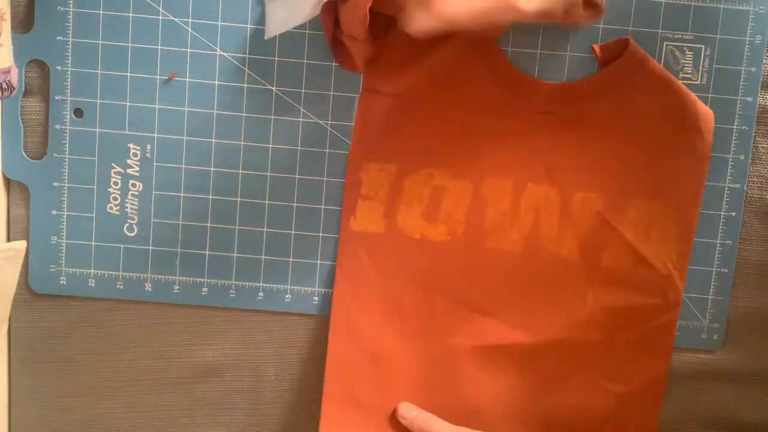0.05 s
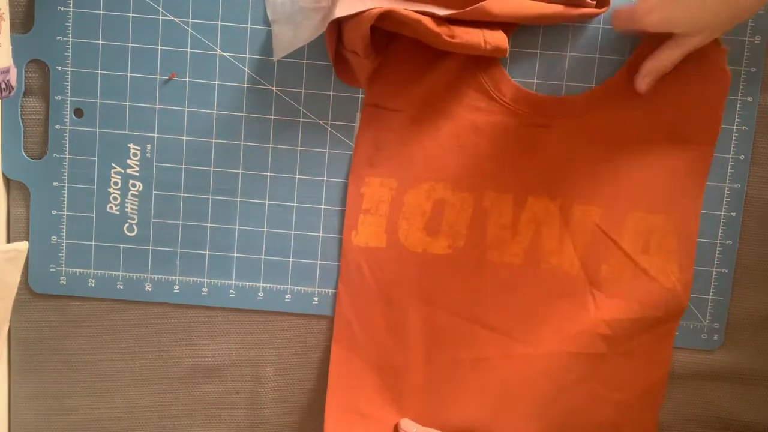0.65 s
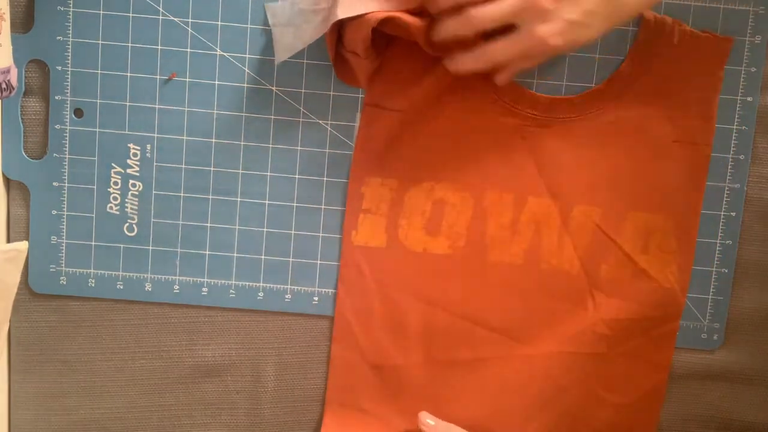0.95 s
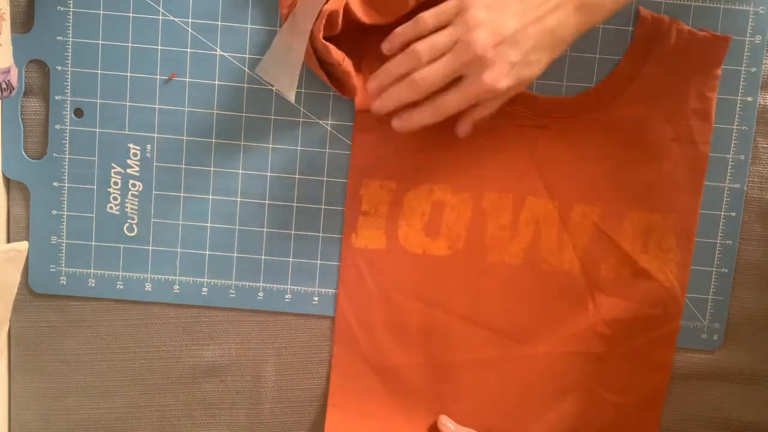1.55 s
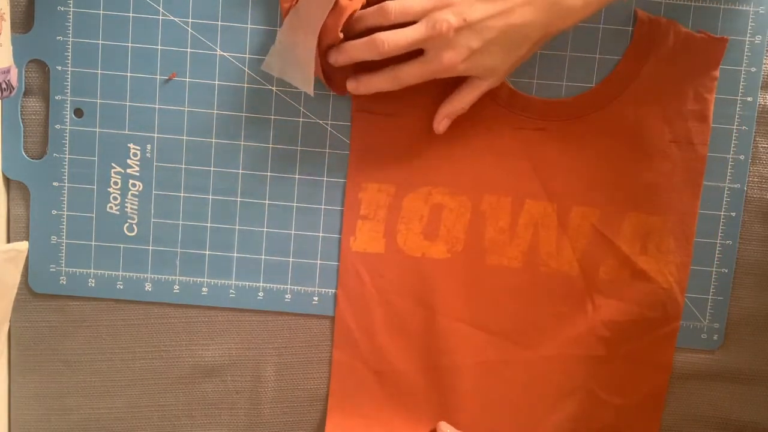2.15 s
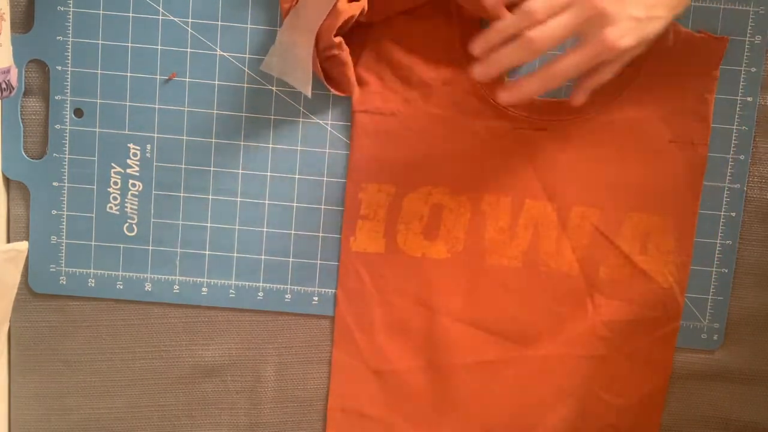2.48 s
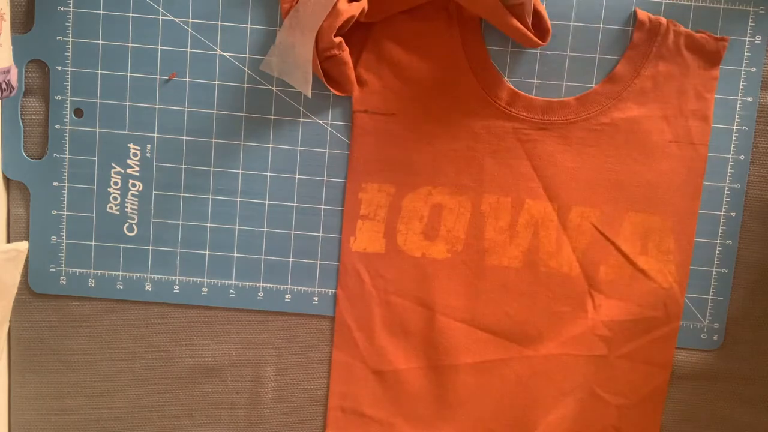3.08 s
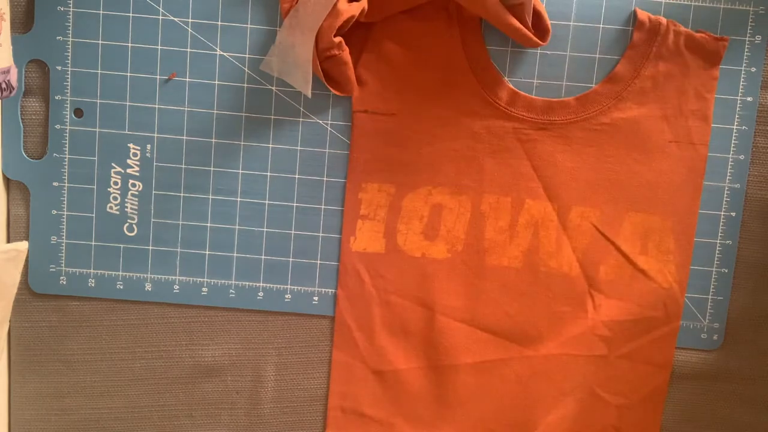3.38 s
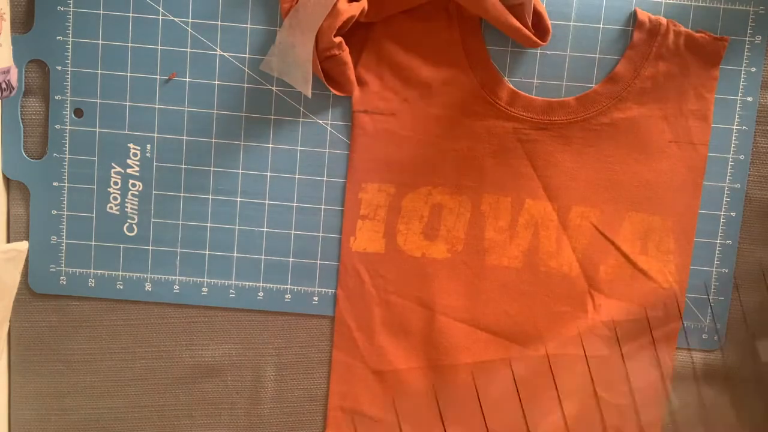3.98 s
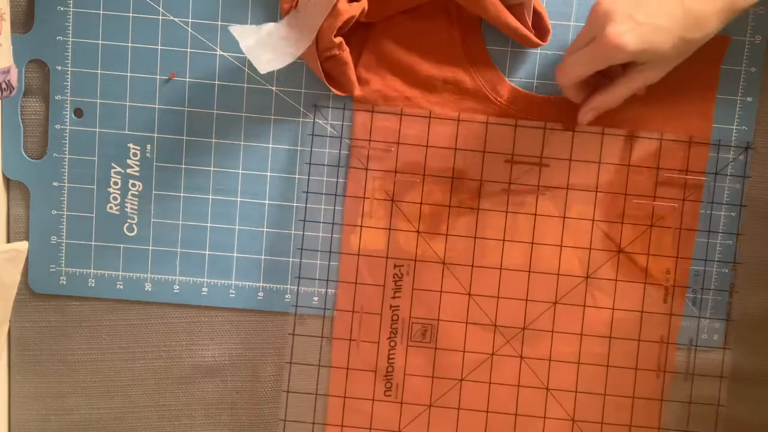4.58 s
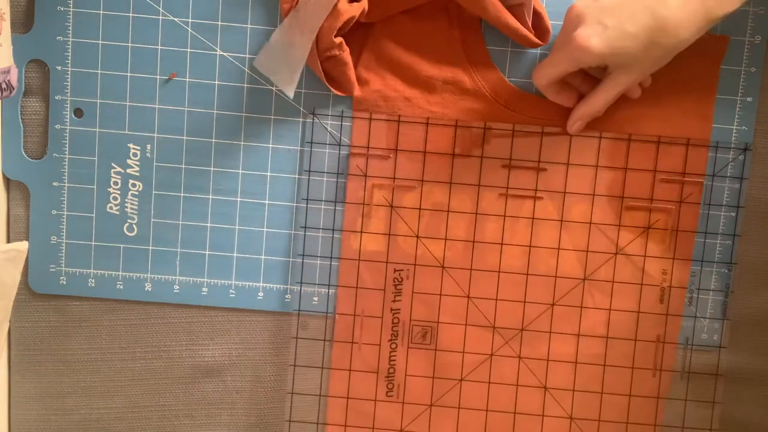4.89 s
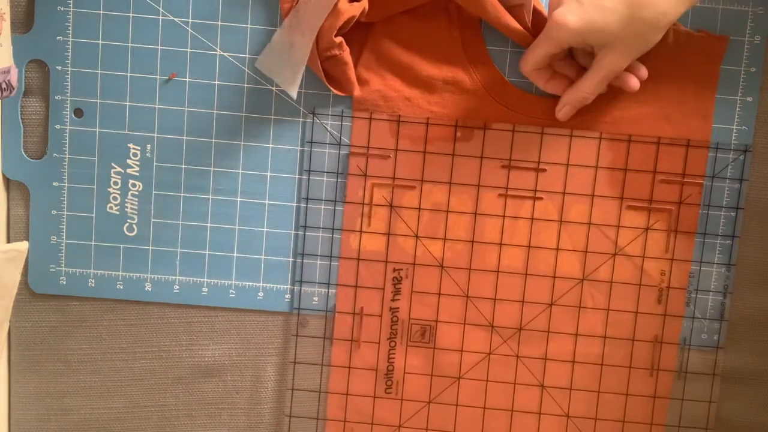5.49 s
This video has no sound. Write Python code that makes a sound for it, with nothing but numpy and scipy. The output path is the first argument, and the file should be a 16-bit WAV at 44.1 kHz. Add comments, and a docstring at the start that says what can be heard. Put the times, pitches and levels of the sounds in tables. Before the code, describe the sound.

Right at the start, a plastic tool clacks down on a table with a cutting mat, rattling and skidding briefly, then knocks again at about 0.5 seconds. Until roughly 2.5 seconds, hands smooth a cotton shirt in soft, hissing strokes, with muffled bumps and low palm pats near 1 second and from 1.5 to 1.8 seconds. Around 2.8 to 3.1 seconds comes another cluster of hard knocks, followed by small dry ticks. Meanwhile an acrylic ruler is dragged across the table and cloth, a quiet, grainy rub lasting until about 4.5 seconds. It lands on the shirt with several light clacks between 4.2 and 4.5 seconds, and is nudged near 4.9 and 5.1 seconds amid brief cloth swishes. The knocks shake the table slightly. Everything is close, in a small room with a faint low rumble and electrical hum.

```python
"""Smoothing a shirt on a cutting mat

Close up, hands turn and smooth a cotton shirt on a plastic mat, its fibres catching in a soft hiss.
A tool clacks down and skids, palms pat the cloth, then an acrylic ruler is dragged over, laid on
the shirt and nudged. Every knock shakes the table; a small room and a faint mains hum lie behind."""
import sys
import numpy as np
from scipy import signal
from scipy.fft import rfft, irfft
from scipy.io import wavfile
from scipy.ndimage import uniform_filter1d

SR = 44100
rng = np.random.default_rng(int(sys.argv[2]) if len(sys.argv) > 2 else 0)


def put_to_file(sound):
    """Save the sound as 16-bit audio at rate SR, in the file named by the first command-line argument."""
    columns = np.atleast_2d(sound).T  # one column per channel
    safe = np.clip(columns, -1, 1)
    whole_steps = np.round(safe * 32767)
    wavfile.write(sys.argv[1], SR, whole_steps.astype(np.int16))


N = 244314
T = np.arange(N) / SR
AGE = T[:SR // 2]  # seconds since a hit

# room tone, mostly deep rumble: freq_hz, gain_db
AIR_EQ = [(12, 13.5), (25, -1), (45, -14), (80, -12.5), (180, -28.5), (300, -25), (600, -36.5), (1000, -36),
          (1700, -41.5), (2500, -47.5), (4000, -50.5), (7500, -52.5), (10000, -57.5), (15000, -63)]
# mains hum partials: pitch_hz, level_db
HUM_PARTIALS = [(59.8, -51), (119.6, -60.5)]
# strokes over the cloth: fastest_s, hiss_db, dull_vs_hiss_db, rise_s, fall_s, rasp_hz
CLOTH_STROKES = [(0.07, -68.5, -0.5, 0.16, 0.48, 1440), (0.39, -61.5, -4, 0.048, 0.083, 8000),
                 (0.535, -59, -0.5, 0.063, 0.027, 3000), (0.915, -56.5, -2, 0.059, 0.13, 2600),
                 (1.14, -66, 2.5, 0.4, .14, 5100), (1.51, -60, 0.5, 0.037, 0.045, 7040),
                 (1.62, -68, -3.5, 0.14, 0.091, 6900), (1.78, -62.5, -0.5, 0.069, 0.14, 7300),
                 (2.13, -69.5, -2.5, 0.29, 0.15, 1860), (3.7, -76.5, 10, 0.2, 0.23, 1760),
                 (4.378, -63.5, 1.5, 0.029, 0.075, 1870), (4.525, -65.5, -1.5, 0.019, 0.54, 1580),
                 (4.72, -63.5, -3, 0.067, 0.085, 2150), (4.865, -61, -0.5, 0.095, 0.16, 4880),
                 (5.13, -63, 0, 0.016, 0.039, 2760), (5.245, -58, -12, 0.052, 0.027, 2960)]
# tone of rubbed cotton: freq_hz, gain_db
COTTON_EQ = [(400, 0.5), (700, -3), (1000, -7.5), (1750, 1), (2400, -1), (3300, -4), (4400, -9.5),
             (5200, -11.5), (6300, -12), (7600, -13), (8700, -17), (12000, -24.5), (15500, -33)]
# the tool hitting mat and table: start_s, tick_db, clack_db, thud_db, shake_db, clack_hz
TOOL_HITS = [(0.0962, -37, -21.5, -18.5, -30.5, 1540), (0.1008, -35.5, -33.5, -72, -26.5, 1530),
             (0.1142, -69, -34, -43, -37, 2000), (0.1402, -51, -31, -52, -47, 1680),
             (0.17, -48, -29.5, -42, -52, 1470), (0.2236, -54, -39, -41, -45, 1440),
             (0.5085, -66, -39, -23.5, -30.5, 450), (0.5443, -47, -42, -45, -40.5, 1730),
             (2.838, -50, -39.5, -46, -31, 2760), (2.8418, -45, -29.5, -42, -47, 1350),
             (2.9652, -41, -28.5, -27.5, -24, 714), (2.9705, -60.5, -30, -38, -35, 645),
             (3.081, -64, -52, -33.5, -31, 520), (3.26, -49.5, -47.5, -45.5, -36.5, 930)]
# borders of a knock's tick, clack and thud registers, high to low: edge_hz
REGISTER_EDGES = [14000, 3000, 450, 150]
# ring of mat and table: pitch_hz, gain_db, t60_s
TABLE_MODES = [(172, -9, .08), (238, -3, .08), (276, 0, .11), (330, 1, .13), (385, -3, .1), (467, -3, .1),
               (548, -2, .1), (695, 0, .08), (790, 1, .05), (905, -3, .045), (1275, 0, .045),
               (1445, 1, .045), (1550, -1, .045), (1785, -2, .04), (1980, -2, .04), (2260, -5, .03),
               (2550, -4, .025), (2760, -7, .018), (3190, -6, .016), (3920, -6, .016), (4400, -4, .016),
               (5550, -1, .016)]
# tone of a hard contact: freq_hz, gain_db
CRACK_EQ = [(150, 12), (1000, 7.5), (3000, 7.5), (6000, -3.5), (7800, -5), (9000, -12), (12000, -22),
            (15000, -33)]
# resonances under the skid: pitch_hz, width_hz, gain_db
SKID_RESONANCES = [(369, 11, 10), (472, 19, 12), (678, 18, 10), (1350, 21, 11), (1650, 22, -4),
                   (1920, 28, -8), (2220, 30, -20), (3510, 50, -8), (4250, 170, -32)]
# tone of the skid's scrape: freq_hz, gain_db
SKID_EQ = [(150, 4), (430, -20), (730, 2), (1050, 2.5), (1450, 2.5), (2050, 3.5), (3000, -22), (4400, -3),
           (5600, -13.5), (7700, -17.5), (10000, -29), (15000, -62)]
# soft bumps through the cloth: start_s, gain_db
SOFT_BUMPS = [(0.424, -48.5), (0.959, -49), (1.487, -53), (1.505, -42), (2.101, -43.5), (2.186, -46),
              (2.473, -47.5), (2.999, -38), (4.912, -42.5)]
# palms bouncing the table: start_s, level_db, pitch_hz, swell_s
PALM_PATS = [(0.953, -30, 81.3, 0.021), (1.486, -20, 80.9, 0.027), (1.553, -29.5, 86, 0.013),
             (1.727, -24.5, 66, 0.014), (1.777, -37.5, 78.4, 0.013), (4.905, -33, 62.3, 0.034)]
# dry handling ticks: start_s, gain_db, pitch_hz
HANDLING_TICKS = [(1.065, -50, 3770), (2.549, -44, 3300), (3.0544, -41, 4000), (3.2176, -45, 4160),
                  (3.279, -41.5, 3840), (3.3362, -42.5, 4250), (3.353, -37.5, 3430), (3.9878, -48, 4270),
                  (4.3388, -43.5, 4370), (4.6178, -44, 5440)]
# pulls of the ruler: fastest_s, murmur_db, crackle_db, rise_s, fall_s
RULER_PULLS = [(2.78, -53, -73, 0.4, 0.4), (3.33, -57, -74, 0.37, 0.24), (4.02, -57.5, -75.5, 0.47, 0.36),
               (4.41, -56, -91, 0.037, 0.038), (4.57, -64.5, -89, 0.1, 0.068)]
# tone of the ruler rubbing the table: freq_hz, gain_db
MURMUR_EQ = [(100, 4.5), (160, -0.5), (220, -1.5), (310, -1.5), (420, -11.5), (510, 1.5), (590, -1.5),
             (680, -10.5), (800, -13.5), (1400, -18.5), (3000, -39.5)]
# tone of its edge brushing the cloth: freq_hz, gain_db
BRUSH_EQ = [(400, -1.5), (1000, -8.5), (1800, 3), (2600, -4.5), (4000, -1.5), (6000, -6), (7600, -4.5),
            (8700, -14.5), (12000, -19.5), (15500, -40)]
# the ruler landing and settling: start_s, tick_db, clack_db, thud_db, shake_db, clack_hz
RULER_HITS = [(4.1639, -53, -46, -66, -72, 2900), (4.3054, -44, -41, -44, -54, 1460),
              (4.3154, -84, -46, -38, -50, 666), (4.3766, -62, -43.5, -50, -46, 665),
              (4.4922, -39, -39, -53, -44, 1550), (4.5004, -74, -37.5, -39, -31.5, 700),
              (4.8963, -45, -45, -36, -32.5, 1510), (5.1262, -68, -51, -43, -74, 1474)]
# ring of the ruler, damped by the shirt: pitch_hz, gain_db, t60_s
RULER_MODES = [(235, -7, .07), (290, -3, .08), (345, -1, .1), (480, -3, .07), (660, 6, .1),
               (1230, -8, .025), (1620, -1, .03), (1950, -2, .025), (2300, -1, .025), (2600, -2, .02),
               (3100, -4, .012), (4500, -6, .01), (6800, 0, .012)]


def undb(db):
    """Decibels to gain."""
    return 10 ** (np.asarray(db) / 20)


def unit(x):
    """Scale to rms 1."""
    return x / np.sqrt(np.mean(x ** 2))


def loudest(x):
    """Rms of the loudest 5 ms."""
    return np.sqrt(uniform_filter1d(x ** 2, 220, mode="constant").max())


def burst(x):
    """Scale so that the loudest 5 ms have rms 1."""
    return x / loudest(x)


def band(x, lo_hz, hi_hz, order=2):
    """Causal band-pass."""
    return signal.sosfilt(signal.butter(order, [lo_hz, hi_hz], "band", fs=SR, output="sos"), x)


def eq(x, points):
    """Minimum-phase EQ through (freq_hz, gain_db) points, built from its cepstrum."""
    hz, db = np.transpose(points)
    n = 2 * len(x)
    bins_hz = np.maximum(np.arange(n // 2 + 1) * SR / n, 1)
    curve_db = np.interp(np.log(bins_hz), np.log(hz), db)
    cepstrum = irfft(np.log(undb(curve_db)))
    cepstrum[1:n // 2] *= 2
    cepstrum[n // 2 + 1:] = 0
    return irfft(rfft(x, n) * np.exp(rfft(cepstrum)))[:len(x)]


def fade(t60_s):
    """Exponential decay, 60 dB down after t60_s."""
    return np.exp(-np.log(1000) * AGE / t60_s)


def noise_hit(t60_s):
    """White noise with an instant attack and a fading tail."""
    return rng.standard_normal(len(AGE)) * fade(t60_s)


def wander(rate_hz):
    """Smooth random modulation with rms 1."""
    hold = int(SR / rate_hz)
    steps = np.repeat(rng.standard_normal(N // hold + 1), hold)
    return unit(uniform_filter1d(uniform_filter1d(steps, hold), hold)[:N])


def slips(per_s, spread_db):
    """Friction grain: tiny stick-slip impulses of uneven size."""
    size = undb(spread_db * np.minimum(rng.exponential(size=N), np.pi))
    return unit((rng.random(N) < per_s / SR) * size * rng.choice([-1, 1], N))


def hand_speed(fastest_s, rise_s, fall_s):
    """A gesture speeds up, peaks and slows to rest."""
    progress = (T - fastest_s) / np.where(T < fastest_s, rise_s, fall_s)
    return np.cos(np.pi / 2 * np.clip(progress, -1, 1))


def add(out, start_s, x):
    """Mix a sound in at its cue."""
    i = int(start_s * SR)
    out[i:i + len(x)] += x[:N - i]


def room_tone():
    """The bed: gently wavering room air and a steady mains hum."""
    air = eq(rng.standard_normal(N), AIR_EQ)
    air *= undb(-62.5) / np.std(band(air, 175, 12000))  # level set above the rumble
    hum = sum(np.sqrt(2) * undb(db) * np.sin(2 * np.pi * (hz * T + rng.random()))
              for hz, db in HUM_PARTIALS)
    return air * undb(0.5 * wander(4.13)) + hum


def cloth_strokes(rasp_vs_dull_db=-7, rasp_ratio=1.07):
    """Fibres catch and let go in a hiss; the pressing palm adds a dull rub, the weave a narrow rasp."""
    catches = slips(per_s=2200, spread_db=3)
    fibres = eq(catches + 0.5 * rng.standard_normal(N), COTTON_EQ)
    weave = rng.standard_normal(N)
    hiss_power, dull_power, rasp = np.zeros((3, N))
    for fastest_s, hiss_db, dull_vs_hiss_db, rise_s, fall_s, rasp_hz in CLOTH_STROKES:
        hiss_gain = undb(hiss_db) * hand_speed(fastest_s, rise_s, fall_s)
        dull_gain = undb(dull_vs_hiss_db) * hiss_gain
        hiss_power += hiss_gain ** 2
        dull_power += dull_gain ** 2
        threads = unit(band(weave, rasp_hz / rasp_ratio, rasp_hz * rasp_ratio, order=1))
        rasp += dull_gain * undb(rasp_vs_dull_db) * threads
    dull = undb(3 + 3.1 * wander(35)) * unit(band(fibres, 256, 1890))
    hiss = undb(-0.9 + 0.26 * wander(50)) * unit(band(fibres, 2840, 15000))
    return np.sqrt(dull_power) * dull + np.sqrt(hiss_power) * hiss + rasp


def ring(modes, scatter_db=2, detune=0.0078):
    """A struck body's fading modes, weighted anew by each place of contact."""
    out = np.zeros(len(AGE))
    for hz, db, t60_s in modes:
        louder, sharper, polarity = rng.standard_normal(3)
        partial = np.sin(2 * np.pi * hz * (1 + detune * sharper) * AGE)
        out += np.sign(polarity) * undb(db + scatter_db * louder) * fade(t60_s) * partial
    return out


def knocks(hits, modes, crack_db, rattle_db, rattle_t60_s):
    """Hard hits: a crack, a brief rattle and a ringing body, balanced into tick, clack and thud."""
    boost_db, boost_ratio, thud_top_hz = 10.5, 1.48, 530
    out = np.zeros(N)
    for start_s, *register_dbs, _, clack_hz in hits:
        body = ring(modes)
        contact = undb(crack_db) * fade(0.0063) + undb(rattle_db) * fade(rattle_t60_s)
        attack = eq(rng.standard_normal(len(AGE)) * contact, CRACK_EQ)
        hit = band(body + attack, 222, 17000)
        # the place of contact favours what rings near the clack pitch
        hit = eq(hit, [(clack_hz / boost_ratio, 0), (clack_hz, boost_db), (clack_hz * boost_ratio, 0)])
        # one EQ point in the middle of each register sets the balance
        tick, clack, thud = [(np.sqrt(lo * hi), db - 20 * np.log10(loudest(band(hit, lo, hi))))
                             for db, hi, lo in zip(register_dbs, REGISTER_EDGES, REGISTER_EDGES[1:])]
        knee = (thud_top_hz, clack[1] - 2.5)
        add(out, start_s, undb(-2.5) * eq(hit, [thud, knee, clack, tick]))
    return out


def table_shake():
    """After each knock the table shudders briefly and sways on its legs a little longer."""
    out = np.zeros(N)
    for start_s, *_, shake_db, _ in [*TOOL_HITS, *RULER_HITS]:
        shudder = burst(band(noise_hit(0.2), 63.3, 109))
        sway = burst(band(noise_hit(0.65), 8.2, 32.2))
        add(out, start_s, undb(shake_db) * (undb(-4.5) * shudder + sway))
    return out


def tool_skid(bite_s=0.16, hold_s=0.026, attack_db_per_s=950, release_db_per_s=516):
    """Plastic bites, chatters over the table and runs out, ringing its resonances."""
    grit = slips(per_s=1500, spread_db=2.1)
    scrape = unit(eq(grit, SKID_EQ))
    rings = sum(undb(db) * band(grit, hz - width_hz / 2, hz + width_hz / 2, order=1)
                for hz, width_hz, db in SKID_RESONANCES)
    before_s, after_s = np.maximum(bite_s - T, 0), np.maximum(T - bite_s - hold_s, 0)
    force = undb(-34 - attack_db_per_s * before_s - release_db_per_s * after_s)
    return force * (undb(-7) * scrape + undb(-4) * unit(rings))


def soft_bumps():
    """A bump cushioned by cloth reaches only the table's low modes."""
    out = np.zeros(N)
    for start_s, gain_db in SOFT_BUMPS:
        thud = ring(TABLE_MODES) + undb(-1) * noise_hit(0.18)
        add(out, start_s, undb(gain_db + 1) * burst(band(thud, 84, 241)))
    return out


def palm_pats():
    """A flat hand pushes slowly: the table's lowest mode swells and dies."""
    out = np.zeros(N)
    for start_s, level_db, pitch_hz, swell_s in PALM_PATS:
        progress = AGE / swell_s
        swell = (progress * np.exp(1 - progress)) ** 2.2
        add(out, start_s, -undb(level_db) * swell * np.sin(2 * np.pi * pitch_hz * AGE))
    return out


def handling_ticks():
    """Single bright ticks of noise, a millisecond or two long."""
    out = np.zeros(N)
    for start_s, gain_db, pitch_hz in HANDLING_TICKS:
        tick = band(noise_hit(0.0082), pitch_hz * 0.54, pitch_hz * 1.43)
        add(out, start_s, undb(gain_db - 13) * burst(tick))
    return out


def ruler_drag(hiss_vs_crackle_db=8.5):
    """The ruler rubs the table with a low, grainy murmur; its edge brushes the cloth and crackles."""
    rub, brush = np.zeros((2, N))
    for fastest_s, murmur_db, crackle_db, rise_s, fall_s in RULER_PULLS:
        speed = hand_speed(fastest_s, rise_s, fall_s)
        rub += undb(murmur_db) * speed
        brush += undb(crackle_db) * speed
    pressure = undb(2 * wander(28))
    murmur = pressure * unit(eq(slips(per_s=900, spread_db=0.5), MURMUR_EQ))
    crackle = unit(band(slips(per_s=110, spread_db=5), 3800, 6400, order=3))
    hiss = undb(hiss_vs_crackle_db) * unit(eq(slips(per_s=2200, spread_db=2.2), BRUSH_EQ))
    return rub * murmur + brush * (crackle + hiss)


def small_room(x, warm_t60_s=0.34, bright_t60_s=0.21, build_s=0.0087):
    """A furnished room adds a short diffuse tail, shorter still in the treble."""
    noise = rng.standard_normal(len(AGE))
    warm = undb(-7.5) * band(noise, 88, 3700, order=1) * fade(warm_t60_s)
    bright = undb(-33.5) * band(noise, 2200, 15000, order=1) * fade(bright_t60_s)
    tail = (warm + bright) * (1 - np.exp(-AGE / build_s))
    tail /= np.linalg.norm(fade(warm_t60_s))
    return x + signal.fftconvolve(x, tail)[:N]


def scene():
    """Mono mix: the handling gets the room's tail; pats, shake and room tone stay dry."""
    tool = knocks(TOOL_HITS, TABLE_MODES, crack_db=17.5, rattle_db=0.5, rattle_t60_s=0.12)
    ruler = knocks(RULER_HITS, RULER_MODES, crack_db=-2.5, rattle_db=8, rattle_t60_s=0.036)
    handling = tool + ruler + soft_bumps() + handling_ticks()
    handling += tool_skid() + cloth_strokes() + ruler_drag()
    return (small_room(handling) + palm_pats() + table_shake() + room_tone())[None]


def record(dry, low_cut_hz=6, high_cut_hz=15700):
    """Master filters: a gentle low cut against drift and a steep high cut."""
    dry = signal.sosfilt(signal.butter(1, low_cut_hz, "high", fs=SR, output="sos"), dry)
    return signal.sosfilt(signal.ellip(10, 0.2, 70, high_cut_hz, fs=SR, output="sos"), dry)


dry = scene()
out = record(dry)
put_to_file(out)
```